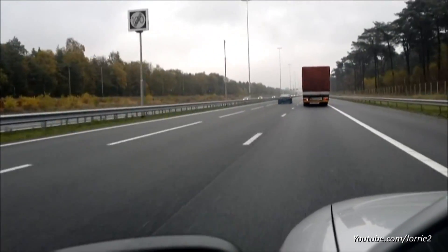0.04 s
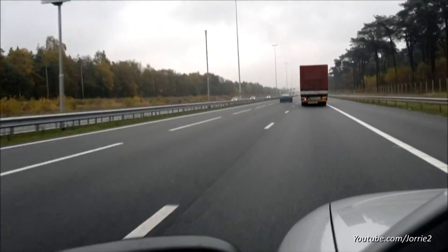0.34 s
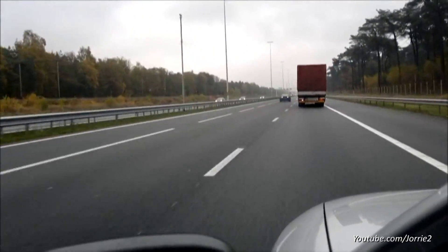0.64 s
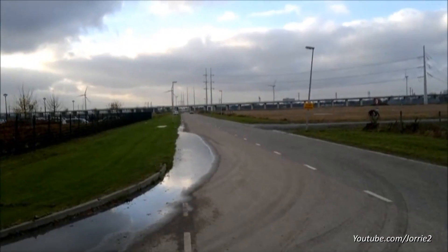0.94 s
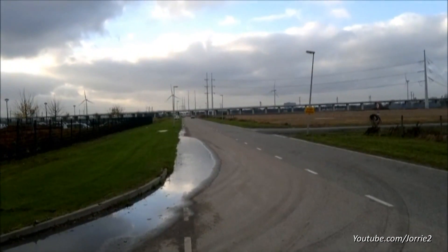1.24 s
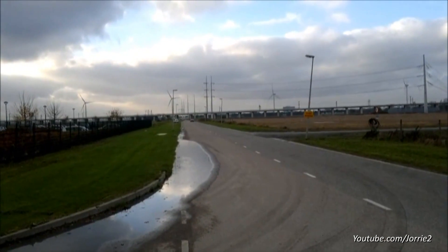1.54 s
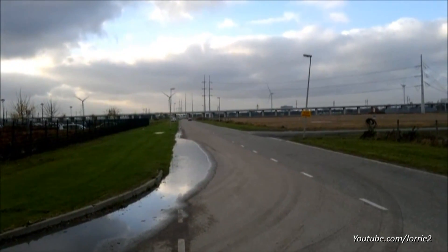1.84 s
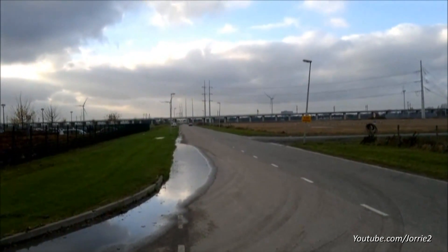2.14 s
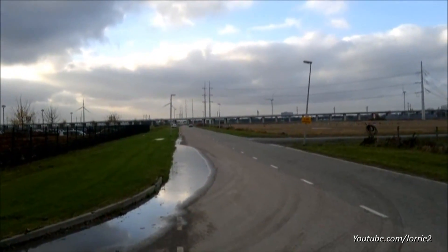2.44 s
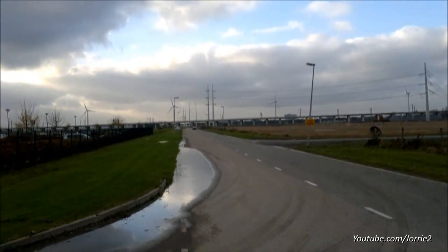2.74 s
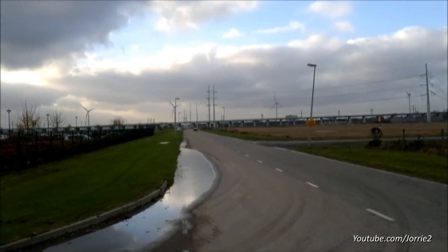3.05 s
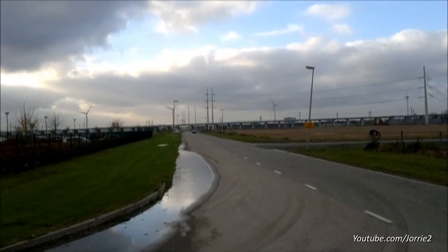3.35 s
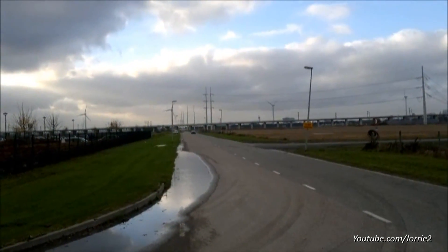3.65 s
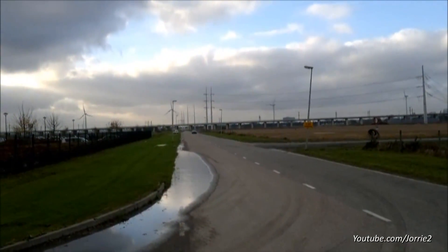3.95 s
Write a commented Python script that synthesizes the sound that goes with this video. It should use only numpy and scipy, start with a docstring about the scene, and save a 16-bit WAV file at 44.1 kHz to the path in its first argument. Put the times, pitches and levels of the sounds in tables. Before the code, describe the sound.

A car engine revs up and accelerates away after a second of loud wind.

```python
"""A six-cylinder car revs up at a quiet roadside, after a short opening scene of motorway wind.
That wind batters a camera on a moving car and overloads it; then the scene cuts to the roadside.
The engine's firings make a hum, a pipe note and a rasp as the car pulls away, shifts up with a crack
of unburnt fuel, lurches and pulls again. Its tyres hiss on the damp road, far traffic rumbles,
and a breeze buffets the right microphone port (the opening that lets sound in)."""
import sys
import numpy as np
from scipy import signal
from scipy.fft import rfft, irfft, next_fast_len
from scipy.io import wavfile
from scipy.ndimage import map_coordinates

SR = 44100
rng = np.random.default_rng(int(sys.argv[2]) if len(sys.argv) > 2 else 0)


def store_pcm(level_fs):
    """Save levels as 16-bit WAV."""
    pcm = np.round(np.clip(level_fs, -1, 1) * 32767).astype(np.int16)
    wavfile.write(sys.argv[1], SR, np.atleast_2d(pcm).T)


N = 176400
T = np.arange(N) / SR
CYLINDERS = 6


def amp(db):
    """Turn decibels into a gain to multiply by."""
    return 10 ** (np.asarray(db) / 20)


def unit(x):
    """Scale a signal to an average (rms) level of 1."""
    return x / np.sqrt(np.mean(x ** 2) + 1e-20)


def curve(rows):
    """Join (time_s, value) points with straight lines, one value per sample."""
    return np.interp(T, *np.transpose(rows))


def fade_in(middle_s, length_s):
    """A straight rise from 0 to 1."""
    return np.clip((T - middle_s) / length_s + .5, 0, 1)


def wobble(rate_hz):
    """A smooth curve through rate_hz random points a second."""
    points = rng.standard_normal(int(N * rate_hz / SR) + 4)
    return np.interp(T, T[::24], map_coordinates(points, [T[::24] * rate_hz]))


def filtered(x, response):
    """Multiply each frequency in x by response(hz)."""
    size = next_fast_len(N + SR // 2)
    return irfft(rfft(x, size) * response(np.fft.rfftfreq(size, 1 / SR)), size)[..., :N]


def coloured(x, spectrum):
    """Shape x with (pitch_hz, level_db) points, then scale it to level 1."""
    pitch_hz, level_db = np.transpose(spectrum)
    return unit(filtered(x, lambda hz: amp(np.interp(np.log(hz + 1), np.log(pitch_hz), level_db))))


def noise(spectrum):
    """Noise of level 1 with the given spectrum."""
    return coloured(rng.standard_normal(N), spectrum)


def swells(rows, width_s):
    """A bell-shaped swell for each (time_s, level_db) row."""
    return sum(amp(db) * np.exp(-.5 * ((T - time_s) / width_s) ** 2) for time_s, db in rows)


def pan(db):
    """Gains that raise the left side by db and lower the right as much."""
    return amp([[db], [-db]])


def motorway_wind():
    """Air swirls at each microphone port: a roar, and brief tearing from the sharpest swirls."""
    # Spectra of the roar and the tearing: pitch_hz, level_db
    roar_spectrum = [(25, -3.5), (60, 1), (130, 3), (250, 0.5), (420, -4.5), (700, -13.5), (1400, -37.5),
                     (4000, -47.5)]
    tear_spectrum = [(200, 3), (600, 0), (1400, -0.5), (2600, -11), (4000, -9), (5500, -20), (7500, -30),
                     (15000, -28.5)]
    # Single sharp swirls: time_s, relative_level_db
    tears = [(0.0094, -10.5), (0.074, -16), (0.1228, -9), (0.171, -8), (0.1968, -5), (0.346, -6),
             (0.3599, -10), (0.4417, -7.5), (0.6864, -12), (0.869, -11.5), (0.918, -20.5)]
    roar, tearing = np.zeros((2, 2, N))
    for side in range(2):
        swirls = wobble(45.8)
        roar[side] = amp(-.5) * noise(roar_spectrum) * unit(amp(1.7 * swirls))
        crackle = amp(-15) * unit(amp(3.3 * swirls + 5.5 * wobble(350)))
        rips = amp(-9) * swells(tears, width_s=.0041) * amp(10.6 * wobble(400))
        tearing[side] = (crackle + rips) * noise(tear_spectrum)
    return roar * pan(-2.2) + tearing * pan(.91)


def engine_tones(cycle, rows, flutter_db):
    """Tones at whole multiples of the engine's cycle rate, each fluttering in level on its own."""
    return sum(amp(db + flutter_db * wobble(14)) * np.sin(round(k) * cycle + rng.uniform(0, 2 * np.pi))
               for k, db in rows)


def engine():
    """Firing cylinders hum, sound a note in the exhaust pipe and make it rasp."""
    # Engine speed: time_s, firings_per_s
    firing_rate = [(1.0, 99), (1.4, 126), (1.55, 151), (1.67, 153), (1.8, 178), (2.0, 203), (2.25, 255),
                   (2.4, 295), (2.6, 372), (2.7, 377), (2.94, 391), (3.0, 312), (3.05, 258), (3.12, 235),
                   (3.17, 278), (3.22, 293), (3.26, 288), (3.32, 268), (3.39, 302), (3.43, 305),
                   (3.49, 296), (3.75, 336), (4.0, 371)]
    # Loudness of the hum, the pipe note and the rasp: time_s, level_db
    hum_levels = [(.92, -36), (1.9, -29.5), (2.3, -40.5), (2.65, -33), (3.1, -34), (4, -31)]
    pipe_levels = [(.92, -59.5), (1.7, -55), (2.0, -42), (2.33, -31), (2.9, -32.5), (3.02, -32),
                   (3.12, -34), (3.21, -27), (3.3, -34.5), (3.37, -28), (4, -30.5)]
    rasp_levels = [(.92, -69.5), (1.6, -58), (2.0, -52), (2.16, -38), (2.42, -25), (2.7, -22.5),
                   (3.01, -23), (3.14, -26), (3.19, -26), (3.25, -26), (3.3, -30), (3.39, -27.5),
                   (3.55, -31), (3.74, -27.5), (4, -28)]
    # Tones of the hum and the pipe (multiple 6 is the firing rate): cycle_multiple, level_db
    hum_tones = [(3, -8), (4, -17), (5, -13), (6, 0)]
    pipe_tones = [(9, -11), (10, -13), (11, -5), (12, 0), (13, -12), (14, -15), (15, -9)]
    # How the pipe rings: pitch_hz, level_db
    pipe_spectrum = [(100, -10), (300, -6), (470, -9), (565, 0), (690, 1), (750, -9), (830, -11),
                     (1100, -22), (2000, -60)]
    firing_hz = curve(firing_rate)
    strain = np.interp(firing_hz, [310, 380], [0, 1])  # high revs make the speed shake
    shake = (.0022 + .004 * strain) * wobble(150)
    cycle = 2 * np.pi * np.cumsum(firing_hz * (1 + shake)) / SR / CYLINDERS
    away = fade_in(middle_s=3.095, length_s=.15)  # 1 once the car is heard from behind
    hum = unit(engine_tones(cycle, hum_tones, flutter_db=2))
    pipe = coloured(engine_tones(cycle, pipe_tones, flutter_db=1.6), pipe_spectrum)
    pipe += amp(-3 - 8 * away) * noise(pipe_spectrum)
    rasp = passing_exhaust(cycle, strain, away)
    return amp(curve(hum_levels)) * hum + amp(curve(pipe_levels)) * pipe + amp(curve(rasp_levels)) * rasp


def exhaust_rasp(cycle, spectrum, accent, tones_over_noise_db):
    """High engine tones mixed with gas noise that puffs once per firing."""
    # Tones that uneven cylinders make stand out: cycle_multiple, extra_db
    uneven_tones = [(17, 8), (23, 7), (24, 6), (26, 6), (30, 8), (42, 6), (45, 6)]
    extra_db = {round(k): db for k, db in uneven_tones}
    firing_lift_db = 3
    rows = [(k, firing_lift_db * (k % CYLINDERS == 0) + accent * extra_db.get(k, 0))
            for k in range(15, 72)]
    tones = engine_tones(cycle, rows, flutter_db=2.4)
    puffs = rng.standard_normal(N) * amp(3.4 * np.cos(CYLINDERS * cycle) + 2 * np.cos(cycle))
    tone_gain = amp(tones_over_noise_db)
    return (tone_gain * coloured(tones, spectrum) + coloured(puffs, spectrum)) / np.hypot(tone_gain, 1)


def passing_exhaust(cycle, strain, away):
    """The rasp opens up as the car passes, gets noisier under strain and barks on the throttle."""
    # The rasp close by, and as the car draws away: pitch_hz, level_db
    close_spectrum = [(300, -30), (700, -19), (960, -20), (1130, -2), (1300, 1), (1480, -4.5), (2200, -2.5),
                      (2600, -7.5), (3400, -6), (4150, -23), (5000, -24), (7000, -44), (9000, -62)]
    away_spectrum = [(300, -32), (700, -9), (1180, -9), (1460, -1), (1700, -6), (1850, -11), (2170, 0),
                     (2600, -9), (3400, -5), (4200, -21), (5600, -22), (7000, -36), (9000, -68)]
    # Muffling while the car is still behind the camera: pitch_hz, gain_db
    muffling = [(1600, 2.5), (1900, -4.5), (2200, -3), (3700, -3.5)]
    # The throttle snaps open after the shift: time_s, level_over_rasp_db
    barks = [(3.015, -6), (3.215, -1)]
    bark_hz, bark_width_hz = (1450, 2070), 110
    close = exhaust_rasp(cycle, close_spectrum, accent=.5, tones_over_noise_db=2 - 4 * strain)
    leaving = exhaust_rasp(cycle, away_spectrum, accent=1, tones_over_noise_db=5 - 4 * strain)
    passed = fade_in(middle_s=2.56, length_s=.29)
    nearing = passed * close + (1 - passed) * coloured(close, muffling)
    rasp = (1 - away) * nearing + away * leaving
    ring = filtered(rasp, lambda hz: sum(np.exp(-((hz - peak) / bark_width_hz) ** 2) for peak in bark_hz))
    return rasp + swells(barks, width_s=.024) * ring


def roadside(car):
    """The car's sound reaches the left port first, is louder on the right and echoes off the roadside."""
    # Balance between the ports: pitch_hz, left_minus_right_db
    balance = [(150, -4), (600, -3), (1300, -1.5), (2400, -4), (4400, -1)]
    port_lag_s, echo_length_s, echo_db = .00016, .18, -8.5
    sides = np.array([[1], [-1]])
    direct = filtered(car, lambda hz: np.exp(1j * np.pi * hz * port_lag_s * sides))
    tail = rng.standard_normal((2, SR // 2)) * amp(-60 * T[:SR // 2] / echo_length_s)
    echo = signal.fftconvolve(car[None], tail / np.linalg.norm(tail[0]), axes=1)[:, :N]
    heard = direct + amp(echo_db) * echo
    return filtered(heard, lambda hz: amp(sides * np.interp(hz, *np.transpose(balance)) / 2))


def breeze():
    """Light wind makes a lumpy rumble, brighter flicks and short gusts, nearly all on the right port."""
    # Spectra of the rumble and the gusts: pitch_hz, level_db
    rumble_spectrum = [(20, -5), (45, 2.5), (100, -0.5), (170, -7.5), (300, -15), (500, -29.5), (1000, -43),
                       (5000, -76.5)]
    gust_spectrum = [(30, -13), (90, 7.5), (190, 3.5), (340, -3.5), (600, -14.5), (1100, -36), (2500, -58),
                     (5000, -84.5)]
    # Strength of the breeze, and its single gusts: time_s, level_db
    breeze_levels = [(.92, -15), (1.3, -17.5), (1.6, -19.5), (2.0, -16), (2.4, -16.5), (2.8, -14),
                     (3.4, -14.5), (4, -13)]
    gusts = [(0.957, -19.5), (1.04, -19), (1.133, -14.5), (1.158, -13.5), (1.182, -15.5), (1.208, -20),
             (1.318, -20), (1.34, -17.5), (1.389, -14.5), (1.406, -17), (1.526, -18.5), (1.566, -14),
             (1.594, -19.5), (1.69, -10.5), (1.724, -10), (1.786, -15), (1.928, -15), (1.95, -13),
             (2.03, -24), (2.143, -16), (2.186, -20.5), (2.25, -16.5), (3.14, -13.5), (3.29, -9),
             (3.48, -11.5)]
    strength = amp(curve(breeze_levels))
    ports = []
    for port_db in (-31, 0):  # left, right
        flicks = amp(-13) * strength * unit(amp(4.2 * wobble(90)))
        rumble = strength * unit(noise(rumble_spectrum) * amp(1.7 * wobble(25)))
        buffets = (swells(gusts, width_s=.0065) + flicks) * noise(gust_spectrum)
        ports.append(amp(port_db) * (rumble + buffets))
    return np.array(ports)


def far_traffic():
    """Distant cars blur into a steady low rumble."""
    # Spectrum of the traffic: pitch_hz, level_db
    spectrum = [(140, -0.5), (300, -22), (1300, -35.5), (3000, -47.5), (6000, -70), (15000, -58.5)]
    return amp(-37.5) * np.array([noise(spectrum), noise(spectrum)])


def tyres():
    """Tyres hiss on the damp road, louder as the car comes near."""
    # Spectrum of the hiss: pitch_hz, level_db
    spectrum = [(200, -6.5), (700, 0.5), (1300, -4), (2500, -2.5), (4800, -14), (6500, -26.5), (12000, -41)]
    # Loudness of the hiss: time_s, level_db
    levels = [(1.55, -79), (1.8, -56), (2.7, -34.5), (4, -39.5)]
    return amp(curve(levels)) * np.array([noise(spectrum), noise(spectrum)])


def exhaust_cracks():
    """Around the gear change, unburnt fuel cracks in the exhaust and rings the pipe."""
    # Small blasts of fuel: start_s, level_db
    cracks = [(2.64, -19.5), (2.9565, -8), (2.9635, -15), (3.007, -23)]
    # How the pipe rings after a blast: pitch_hz, level_db
    spectrum = [(170, -12), (850, -15), (1300, 0), (2050, -3), (2600, -13), (3500, -13), (4500, -23),
                (7500, -39), (10000, -58)]
    fade_s = .05  # time to fall by 60 dB
    loudness = sum((T >= start_s) * amp(db - 60 * np.abs(T - start_s) / fade_s) for start_s, db in cracks)
    blasts = rng.standard_normal(N) * loudness
    return coloured(blasts, spectrum) * np.std(blasts)


def scene():
    """The motorway wind, then a hard cut to the roadside."""
    traffic = far_traffic()
    wind = motorway_wind()
    car = roadside(engine() + exhaust_cracks()) + tyres()
    after_cut = fade_in(middle_s=.923, length_s=.002)
    return (1 - after_cut) * wind + after_cut * (car + breeze() + traffic)


def record(dry):
    """The camera flattens the loudest peaks, dulls the treble and drops the very highest pitches."""
    # Treble response of the microphone: pitch_hz, gain_db
    microphone = [(6000, 1), (10000, -8), (15800, -17)]
    clip_level, top_hz = .92, 15800
    clipped = dry / (1 + np.abs(dry / clip_level) ** 9) ** (1 / 9)
    return filtered(clipped, lambda hz: amp(np.interp(hz, *np.transpose(microphone))) * (hz < top_hz))


dry = scene()
out = record(dry)
store_pcm(out)
```